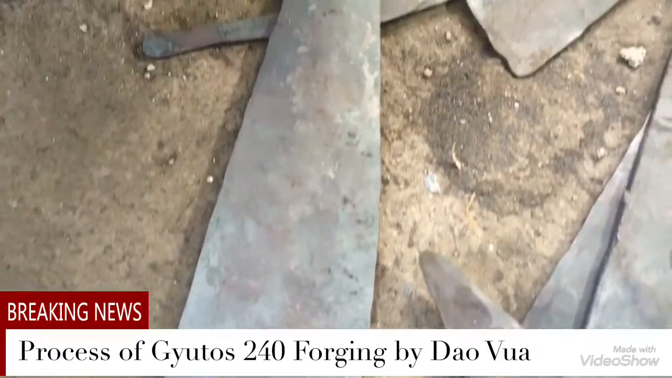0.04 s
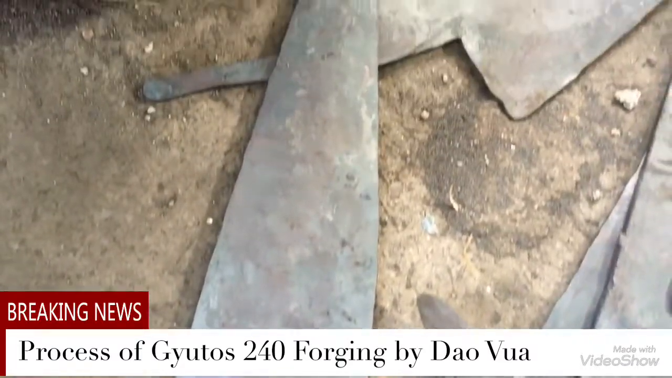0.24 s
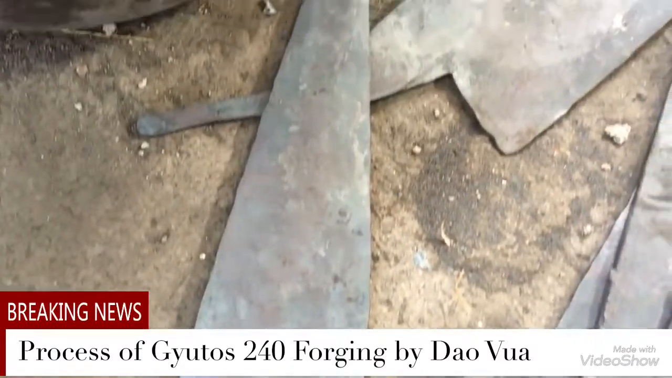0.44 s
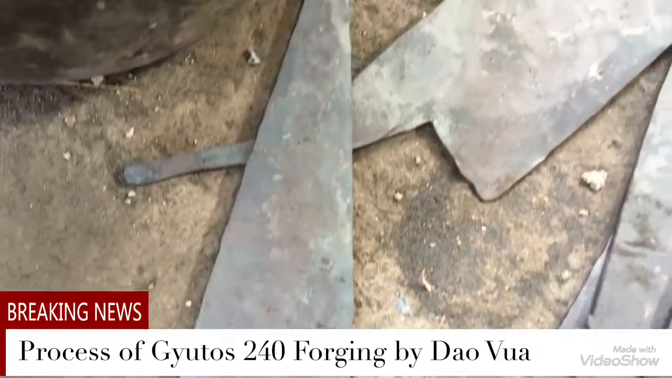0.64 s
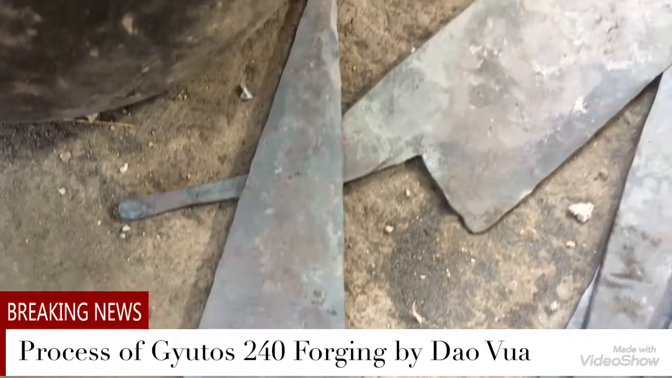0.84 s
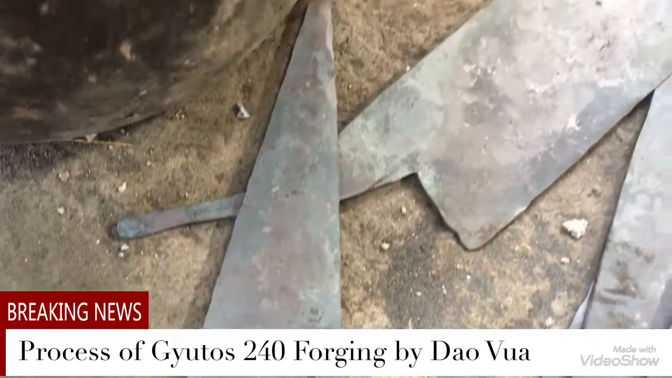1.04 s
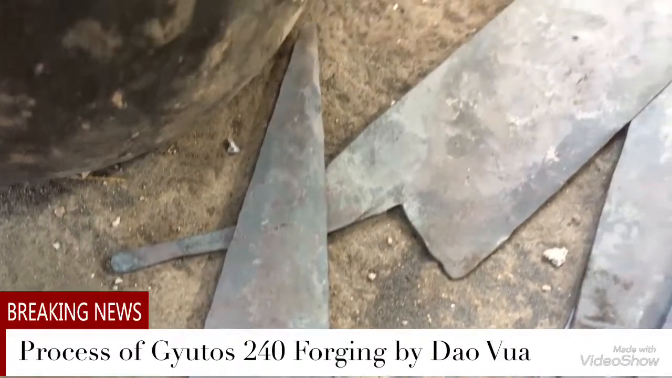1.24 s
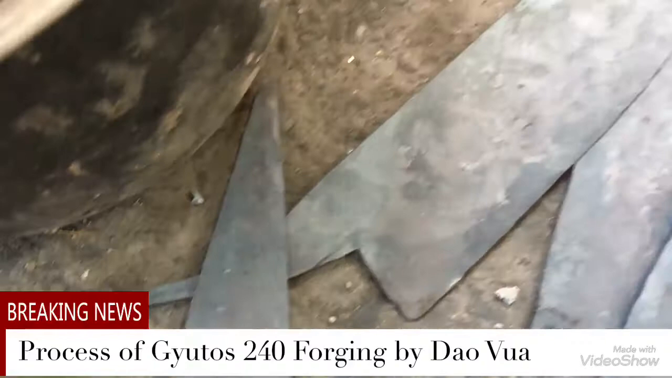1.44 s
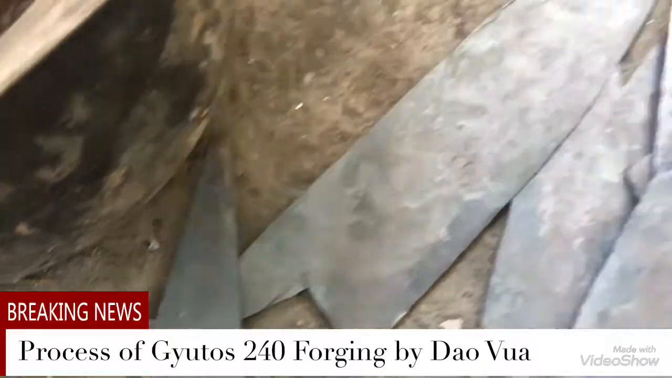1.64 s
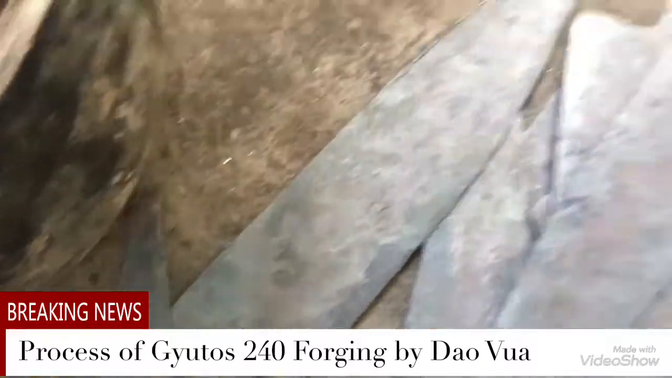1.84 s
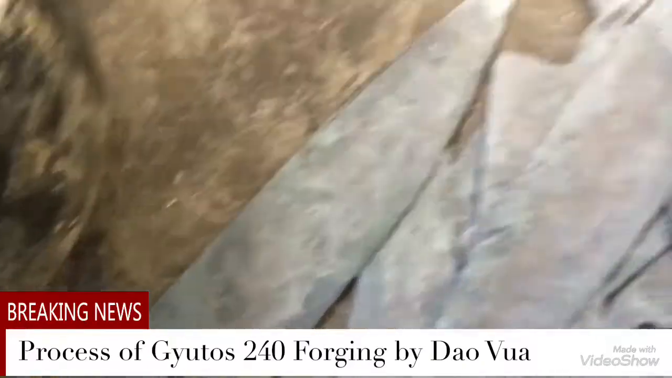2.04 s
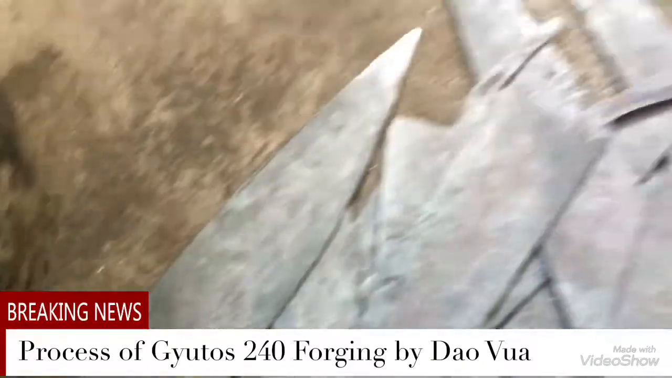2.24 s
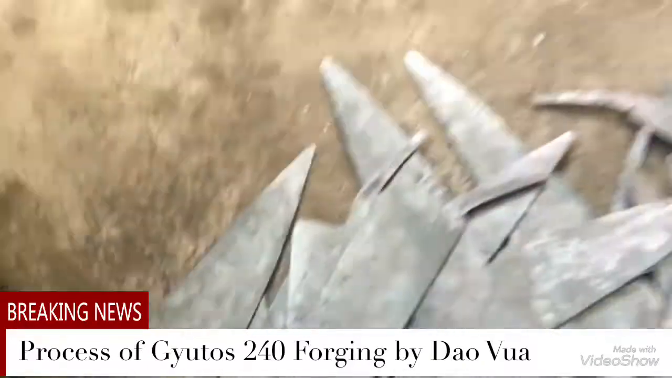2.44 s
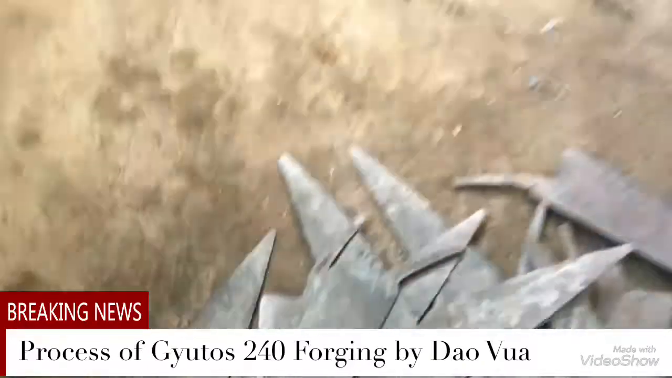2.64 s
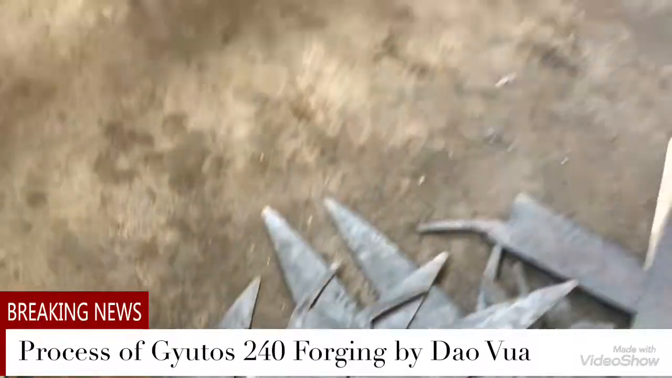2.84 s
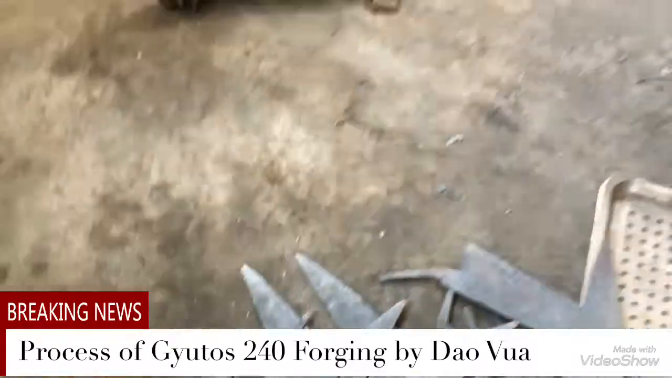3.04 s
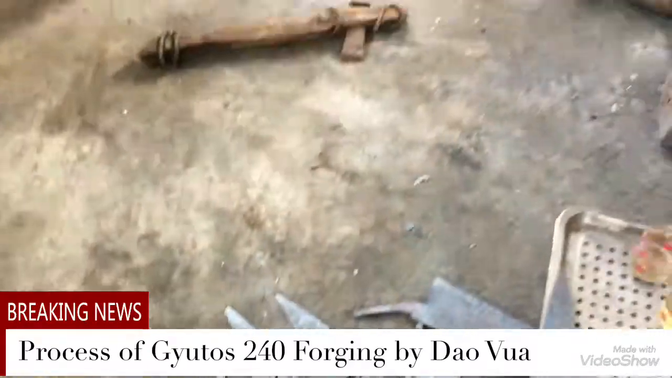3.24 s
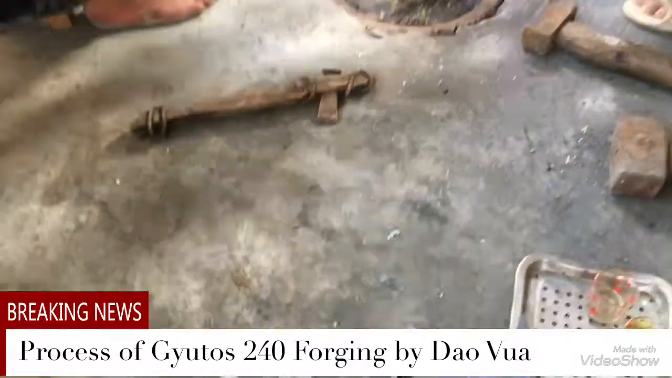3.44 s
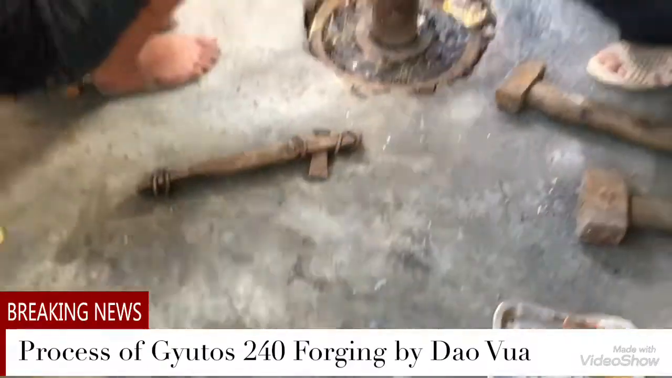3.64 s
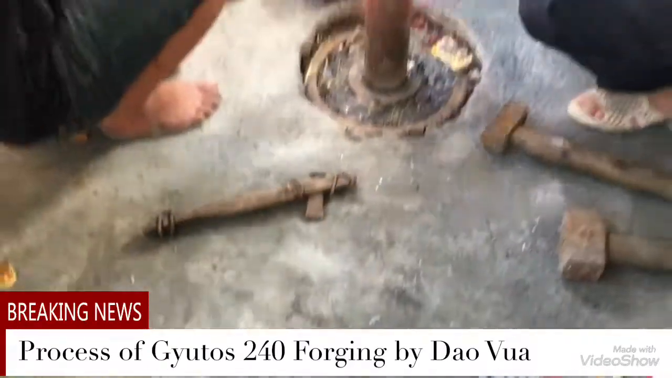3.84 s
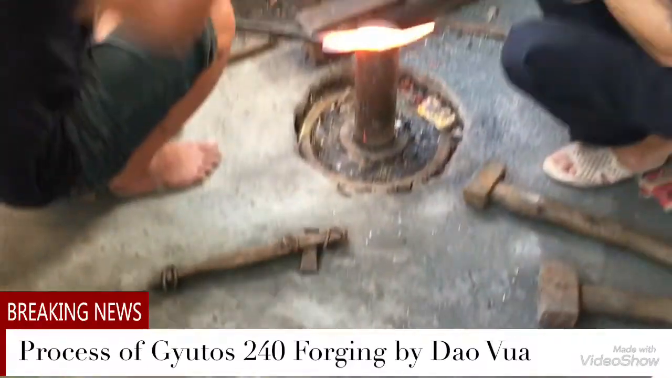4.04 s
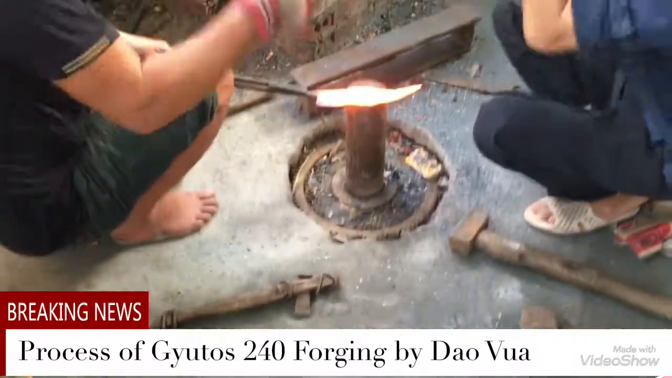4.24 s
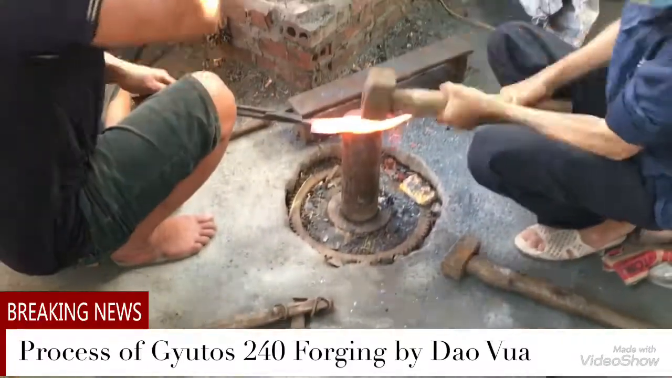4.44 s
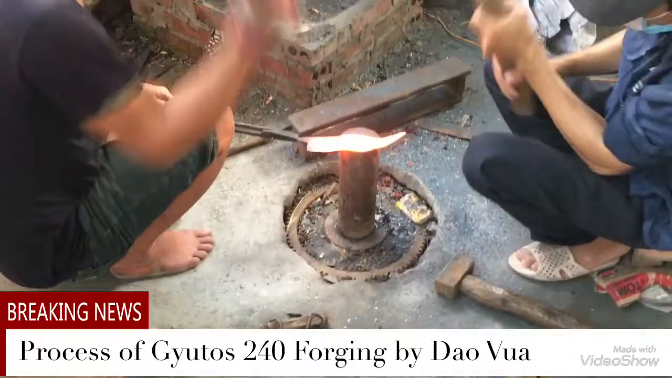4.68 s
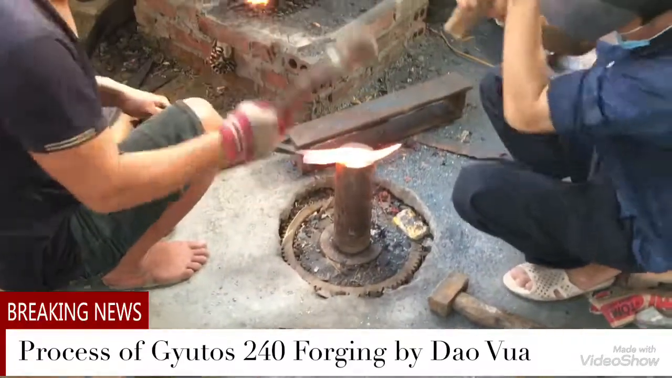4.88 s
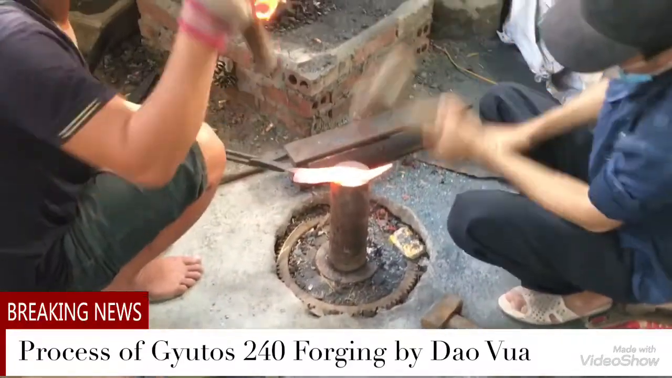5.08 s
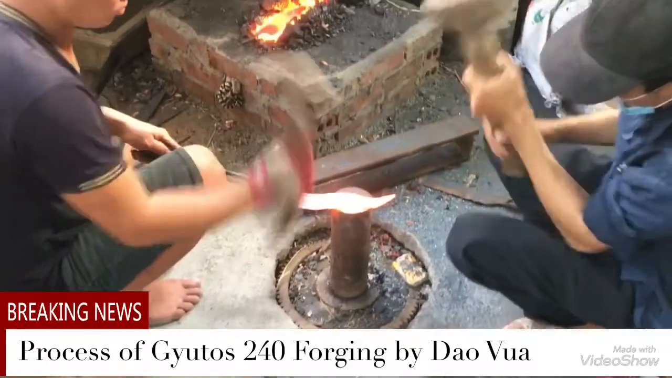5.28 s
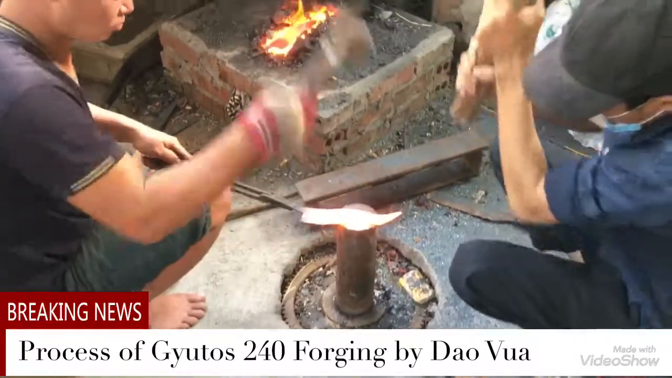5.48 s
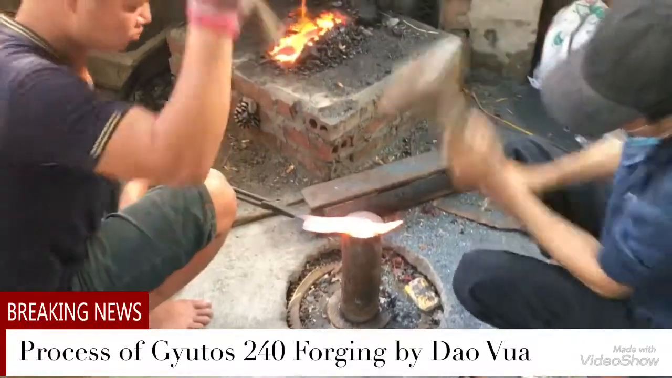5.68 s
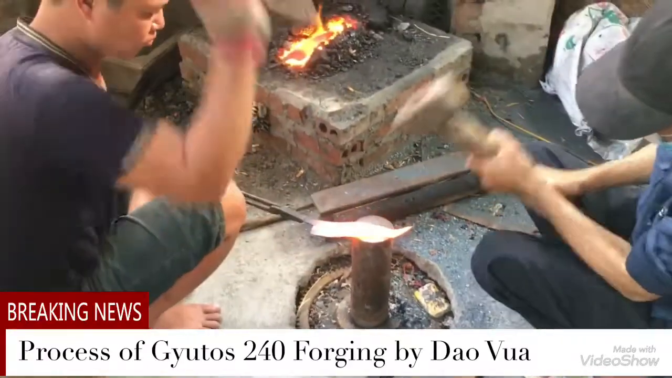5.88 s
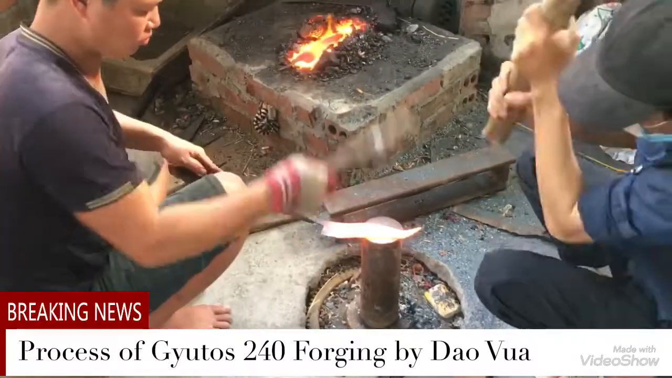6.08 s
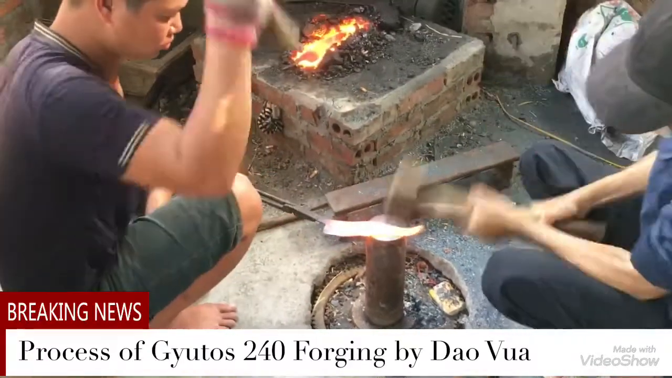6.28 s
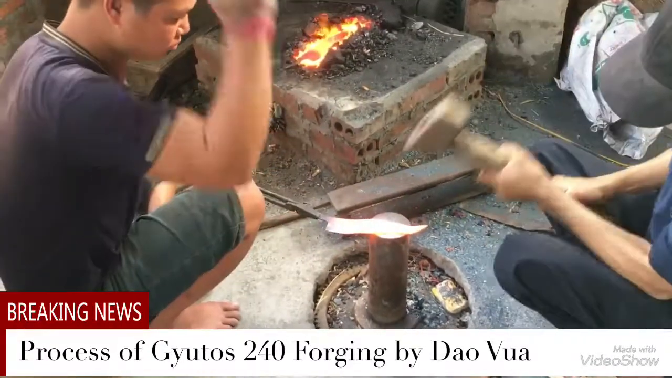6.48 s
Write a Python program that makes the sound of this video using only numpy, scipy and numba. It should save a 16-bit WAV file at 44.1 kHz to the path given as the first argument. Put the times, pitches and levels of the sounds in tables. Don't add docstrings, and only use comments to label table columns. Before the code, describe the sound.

A forge blower hums and hisses at the back of an open shed. A tool thuds down with a short gritty scrape, tongs clink, and two light taps follow. Then a sledge and a hand hammer alternate steadily on hot steel over an anvil, each blow a hard crack and short clang with a brief roomy tail. A phone a few metres away flattens the peaks and ducks the blower.

```python
import sys
import numpy as np
from scipy import signal
from scipy.fft import rfft, irfft, next_fast_len
from scipy.io import wavfile
from scipy.ndimage import uniform_filter1d
from numba import njit

SR = 44100
rng = np.random.default_rng(int(sys.argv[2]) if len(sys.argv) > 2 else 0)


def to_wav(sig):
    pcm = np.clip(np.atleast_2d(sig), -1, 1) * 32767
    pcm = np.round(pcm).astype(np.int16)
    wavfile.write(sys.argv[1], SR, pcm.T)


def volts_from_decibels(level):
    exponent = np.asarray(level, float) / 20
    return 10 ** exponent


N = 287091
TAIL = 32768
LEAD = 1024
FREQ = np.maximum(np.arange(TAIL // 2 + 1) * SR / TAIL, 1)

# frequency in Hz, level in dB per Hz.
BLOWER_ROAR = [(15, -47.5), (25, -17), (64, -1), (166, -9), (200, -1), (223, -14), (285, -5), (335, -16),
               (384, -11.5), (489, -16), (734, -18.5), (1160, -15.5), (2350, -19.5), (2800, -24),
               (16000, -48.5)]
# start in seconds, length in seconds, pitch in Hz, level in dB.
HUM_SURGES = [(0.0, 1.6, 198.8, -59.5), (.72, 0.42, 197.3, -50.5), (2.1, .5, 208.3, -54.5),
              (3.396, 0.31, 219, -51.5), (4.397, 2.6, 208, -69.5)]
# frequency in Hz, level in dB.
MOTOR_LINES = [(298, -56), (395, -59), (495, -61)]
# time in seconds, level in dB.
PHONE_TURN = [(0, -2), (1.9, -0.5), (2.45, -6.5), (2.8, -1), (3.15, -14), (3.8, -8), (4.4, -7.5),
              (4.75, -1.5), (5.1, -9.5), (6.5, -6.5)]
# start in seconds, length in seconds, level in dB.
TONG_DRAGS = [
    (0.415, .135, -55.5),
    (0.7, .014, -63),
]
# start in seconds, level in dB, pitch in Hz.
KNOCKS = [(.4172, -19, 211), (0.4175, -22, 344), (.4172, -18.5, 560), (1.532, -31.5, 111),
          (1.574, -31.5, 81), (1.6, -37, 66.3), (1.946, -20, 60), (1.99, -22, 65), (2.261, -18, 150),
          (2.62, -22, 70), (2.924, -13, 63.6), (2.92, -12, 134), (3.555, -22, 131), (4.722, -32.5, 120),
          (4.745, -37, 70), (4.764, -34, 110)]
# frequency in Hz, time to fall by 60 dB in seconds.
SHED_T60 = [(60, 0.66), (250, 0.39), (700, 0.38), (1840, 0.39), (4850, 0.31), (12800, 0.27)]

# start in seconds, force in dB, heft in dB (more lows from a flat landing),
# bite in dB (more treble from an edge landing), and for the hammers the whistle ahead of it in dB.
THUD_BLOWS = [
    (.419, -17, 0, 0),
]
CLINK_BLOWS = [
    (0.7495, -23.5, 4, 1),
    (0.7635, -30.5, 0, 1),
    (0.8242, -31, -5, -1),
]
TAP_BLOWS = [
    (1.156, -14, 1, 2.2, -30),
    (1.388, -15, -1, -2.2, -35),
]
HAND_BLOWS = [(2.258, -11.5, -0.29, -1.3, -27), (2.921, -12.5, -0.8, 1.3, -39),
              (3.556, -11, -0.7, -0.9, -37), (4.195, -10.5, 0.43, 1.8, -28),
              (4.825, -10.5, -0.42, 1.6, -37), (5.450, -12.5, 2, 1.1, -30), (6.079, -10.5, 1, -1.7, -28)]
SLEDGE_BLOWS = [(1.941, -7, 0.5, -1.5, -28), (2.605, -9, 0, -1.5, -35), (3.2545, -11.5, 2, 0, -50),
                (3.8955, -10, 3, 4, -27), (4.527, -9.5, -1, -1.5, -39), (5.163, -10.5, 1, 1.5, -32),
                (5.7932, -8, -1.5, -.5, -27), (6.413, -9, 1, 0, -31)]

# frequency in Hz, level in dB per Hz.
THUD_CRACK = [(24, -68), (40, -12), (218, 0), (1030, -22), (1610, -36), (1970, -28), (2100, -59),
              (4250, -32), (5000, -55), (6500, -80), (11000, -120)]
CLINK_CRACK = [(120, -12), (200, 12.5), (245, 0.5), (380, 0), (735, -11), (1040, -6), (3370, -8.5),
               (5730, -7.5), (16000, -22.5)]
TAP_CRACK = [(24, -37), (40, -3.5), (185, -2.5), (256, -11), (337, -6.5), (615, -15), (1950, -0.5),
             (4930, -11.5), (7170, -11), (13400, -22), (16000, -27)]
HAND_CRACK = [(24, -38), (40, -18), (151, -17.5), (402, -12), (503, -19), (680, -9.5), (2260, -1.5),
              (2840, -10.5), (4340, -8.5), (4930, -10), (7000, -7), (8340, -16.5), (16000, -26.5)]
SLEDGE_CRACK = [(24, -54), (40, -10), (155, -2), (503, -12), (751, -12), (1070, -9), (1720, -4),
                (2050, -8.5), (4930, -17.5), (7000, -20), (7930, -24), (14500, -26.5), (16000, -29)]

# frequency in Hz, width in Hz, level over the crack in dB.
THUD_RING = [(198, 78, 2.2), (520, 150, 3.3), (1020, 60, 7.8)]
CLINK_RING = [(1015, 41, 11), (7900, 330, 1.5)]
TAP_RING = [(100, 50, -13), (1018, 41, 7), (1430, 440, 4), (3290, 400, 4), (7100, 270, 5)]
HAND_RING = [(97, 14, -8), (284, 24, 5.5), (10650, 410, -1.5), (155, 155, 10.5), (1800, 87, 2),
             (2310, 35, 1.5), (3130, 1000, 5), (7130, 260, 7)]
SLEDGE_RING = [(99.4, 36, -9.5), (283, 11, 8.5), (510, 57, -2), (10600, 450, -1.5), (149, 17, 2),
               (348, 41, 8.5), (740, 120, 10), (1666, 210, 6), (2900, 440, 5), (3960, 600, 6.5),
               (6130, 1400, 4.5), (7080, 400, 7.5)]

# frequency in Hz, width in Hz,
# time to fall by 60 dB in seconds, level in dB.
TAP_MODES = [(2500, 5100, 0.87, 2.5), (9000, 8000, 0.5, -3)]
HAND_MODES = [(7050, 400, 0.74, -2), (9700, 370, 0.43, -10.5), (2900, 5000, 0.82, 3.5),
              (11000, 9600, 0.27, 2)]
SLEDGE_MODES = [(754, 28, 0.33, 8.5), (1713, 200, 0.85, 3.5), (1507, 64, 0.37, 9), (2850, 222, 0.41, 4),
                (6980, 280, 0.61, -6.5), (9650, 370, 0.32, -3.5), (2450, 3900, 0.8, 3),
                (11000, 6400, 0.27, -5), (4050, 350, 0.33, 5.5)]

# level in dB, centre in Hz, width in Hz.
TAP_TICKS = (-53, 6000, 8000)
HAND_TICKS = (-37.5, 6600, 4200)
SLEDGE_TICKS = (-49.5, 6000, 8000)
# frequency in Hz, width in Hz, depth in dB.
PORT_DIP = (4860, 410, -4)


def along(table, hz):
    table = np.array(table, float)
    return np.interp(np.log(hz), np.log(table[:, 0]), table[:, 1])


def causal(db):
    c = irfft(db * np.log(10) / 20)
    c[1:len(c) // 2] *= 2
    c[len(c) // 2 + 1:] = 0
    return np.exp(rfft(c))


def walk(rate):
    k = int(SR / rate)
    steps = np.repeat(rng.standard_normal(N // k + 1), k)
    return 0.21 * uniform_filter1d(uniform_filter1d(steps, k), k)[:N]


def swell(s, length, db, rise_db_s, fall_db_s):
    t = np.arange(N) / SR
    return volts_from_decibels(db - rise_db_s * np.maximum(s - t, 0) - fall_db_s * np.maximum(t - s - length, 0))


def blower_air(turn):
    size = 2 * next_fast_len(N // 2 + 1)
    hz = np.maximum(np.arange(size // 2 + 1) * SR / size, 1)
    noise = rfft(rng.standard_normal(size)) * volts_from_decibels(along(BLOWER_ROAR, hz))
    gust, air = walk(0.29), 0
    for centre in 31.25 * 2. ** np.arange(10):
        share = np.clip(1 - abs(np.log2(hz / centre)), 0, 1)
        flicker = (0.56 + 150 / centre) ** 0.2 * walk(2.7)
        air = air + irfft(noise * share)[:N] * volts_from_decibels(turn * (centre < 700) + 0.8 * gust + flicker)
    return air / air.std() * volts_from_decibels(-49.5)


def blower_hum():
    surges = np.array([swell(s, length, db, rise_db_s=49, fall_db_s=56) for s, length, _, db in HUM_SURGES])
    hz = np.transpose(HUM_SURGES)[2] @ surges / surges.sum(0)
    phase = 2 * np.pi * np.cumsum(hz * (1 + 0.0059 * walk(9.7))) / SR
    return surges.sum(0) * np.sin(phase) * np.sqrt(2) * volts_from_decibels(2.2 * walk(6))


def motor(turn):
    t = np.arange(N) / SR
    return sum(volts_from_decibels(db + 2 * turn + 7 * walk(4)) * np.sin(2 * np.pi * hz * t) for hz, db in MOTOR_LINES)


def blower():
    turn = np.interp(np.arange(N) / SR, *np.transpose(PHONE_TURN))
    return blower_air(turn) + blower_hum() + motor(turn)


def scrape():
    grit = rng.standard_normal(N) * volts_from_decibels(2.2 * rng.exponential(size=N))
    grit = signal.sosfilt(signal.butter(2, [3500, 10500], "bandpass", fs=SR, output="sos"), grit)
    drags = sum(swell(*drag, rise_db_s=2000, fall_db_s=290) for drag in TONG_DRAGS)
    return grit / grit.std() * drags


def bumps():
    t, out = np.arange(N) / SR, np.zeros(N)
    swings = 1.2
    for s, db, hz in KNOCKS:
        fade = np.exp(-np.maximum(t - s, 0) * hz / swings)
        out += volts_from_decibels(db) * np.sin(2 * np.pi * hz * (t - s)) * fade * (t > s)
    return out


def ground():
    t = np.arange(-LEAD, 0) / SR
    return volts_from_decibels(-12.0) * np.sin(2 * np.pi * 150 * t) * np.exp(t / 0.0047)


def shed_octaves(shrink):
    t, hz = np.arange(TAIL) / SR, 62.5 * 2. ** np.arange(9)[:, None]
    share = np.clip(1 - abs(np.log2(np.clip(FREQ, 62.5, 16000) / hz)), 0, 1)
    build = 1 - np.exp(-t / (0.0011 + 0.1 / hz))
    build = build * (1 + 0.28 * np.exp(-t / 0.038))
    return share, build * np.exp(-np.log(1000) * t / (shrink * along(SHED_T60, hz)))


def shed(share, decay, crack_db):
    noise = rng.standard_normal(TAIL)
    grain_db = 1.3 + 2.5 * np.exp(-np.arange(TAIL) / (.03 * SR))
    grain = volts_from_decibels(grain_db * np.repeat(rng.standard_normal(TAIL // 64), 64))
    echo = np.sum(irfft(rfft(noise * grain) * share) * decay, axis=0)
    direct = np.diff(rng.standard_normal(257)) * np.exp(-np.arange(256) / (.0011 * SR))
    echo[:256] += volts_from_decibels(crack_db) * direct
    return rfft(echo)


def cluster(hz, width, t60, db):
    t = np.arange(TAIL) / SR
    ring = irfft(rfft(rng.standard_normal(TAIL)) / (1 + (2 * (FREQ - hz) / width) ** 2))
    return volts_from_decibels(db) * ring / ring.std() * (1 - np.exp(-t / 0.0017)) * np.exp(-np.log(1000) * t / t60)


def blows(rows, crack, rings, modes, lift_db, crack_db, shrink, modes_db=0, ground_db=-80):
    out, octaves = np.zeros(N + TAIL), shed_octaves(shrink)
    for s, force_db, heft_db, bite_db, *_ in rows:
        db = along(crack, FREQ) + along([(800, heft_db), (2000, 0), (7000, bite_db)], FREQ)
        for hz, width, ring_db in rings:
            struck_db = ring_db + 2.7 * rng.standard_normal()
            db = db + struck_db / (1 + (2 * (FREQ - hz) / width) ** 2)
        sound = irfft(causal(db) * shed(*octaves, crack_db))
        sound = sound / np.sqrt(np.mean(sound[:1300] ** 2))
        sound = sound + volts_from_decibels(modes_db) * sum(cluster(*mode) for mode in modes)
        i = int((s + .0007) * SR)
        out[i - LEAD:i + TAIL] += np.r_[ground() * volts_from_decibels(ground_db), sound] * volts_from_decibels(force_db + lift_db)
    return out[:N]


def forerunners():
    out, t = np.zeros(N), np.arange(LEAD) / SR
    lead_s = LEAD / SR
    first_tick = np.exp(-((t - .0012) / 0.00045) ** 2)
    second_tick = 0.29 * np.exp(-((t - .0015 - lead_s / 2) / 0.00066) ** 2)
    ticks = 0.047 + first_tick + second_tick
    whistle = np.sin(2 * np.pi * 3130 * t) * np.exp((t - lead_s) / 0.0043)
    for rows, (db, hz, width) in ((SLEDGE_BLOWS, SLEDGE_TICKS), (HAND_BLOWS, HAND_TICKS), (TAP_BLOWS, TAP_TICKS)):
        band = signal.butter(2, [max(hz - width / 2, 300), hz + width / 2], "bandpass", fs=SR, output="sos")
        for s, *_, whistle_db in rows:
            i = int((s + .0005) * SR)
            tick_db = db + 17.5 * np.exp(-abs(s - SLEDGE_BLOWS[0][0]) / 0.49)
            hiss = signal.sosfilt(band, rng.standard_normal(LEAD))
            out[i - LEAD:i] += volts_from_decibels(tick_db) * hiss * ticks + volts_from_decibels(whistle_db) * whistle
    return out


def scene():
    anvil = blows(SLEDGE_BLOWS, SLEDGE_CRACK, SLEDGE_RING, SLEDGE_MODES,
                  lift_db=-0.5, crack_db=10, shrink=0.91, modes_db=-27, ground_db=0.0)
    anvil += blows(HAND_BLOWS, HAND_CRACK, HAND_RING, HAND_MODES,
                   lift_db=-1.0, crack_db=7.5, shrink=0.96, modes_db=-27.5, ground_db=-2)
    anvil += blows(TAP_BLOWS, TAP_CRACK, TAP_RING, TAP_MODES,
                   lift_db=-3, crack_db=5, shrink=0.95, modes_db=-25.5, ground_db=-4)
    tools = blows(CLINK_BLOWS, CLINK_CRACK, CLINK_RING, [], lift_db=-10.5, crack_db=15.5, shrink=1.0)
    tools += blows(THUD_BLOWS, THUD_CRACK, THUD_RING, [], lift_db=-14, crack_db=10, shrink=1.0)
    return (anvil + tools + bumps() + scrape() + blower())[None]


@njit
def follow(x, attack, release):
    y, e = np.empty(len(x)), 0.
    for i in range(len(x)):
        e += (abs(x[i]) - e) * (attack if abs(x[i]) > e else release)
        y[i] = e
    return y


def top_cut(x):
    return signal.sosfilt(signal.butter(12, 16960, fs=SR, output="sos"), x)


def record(dry):
    hz, width, dip_db = PORT_DIP
    x = dry[0] - (1 - volts_from_decibels(dip_db)) * signal.lfilter(*signal.iirpeak(hz, hz / width, fs=SR), dry[0])
    slow = follow(x, 1 / (0.09 * SR), 1 / (.35 * SR))
    x = x * np.minimum(1, (volts_from_decibels(-28.5) / (slow + 1e-9)) ** 0.22)
    fast = follow(np.roll(x, -40), 1 / (0.000078 * SR), 1 / (0.0055 * SR))
    x = x * np.minimum(1, (volts_from_decibels(-8) / (fast + 1e-9)) ** .6)
    x = .56 * np.tanh(x / .56) + forerunners()
    x = signal.sosfilt(signal.ellip(10, .2, 40, 15750, fs=SR, output="sos"), x)
    return top_cut(x[None])


dry = scene()
out = record(dry)
to_wav(out)
```